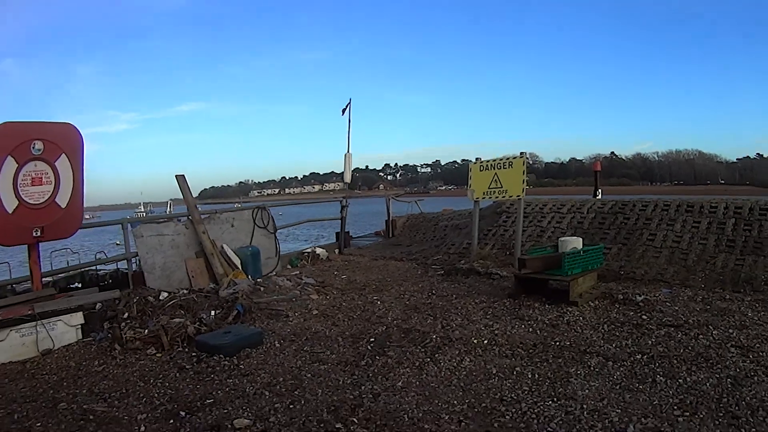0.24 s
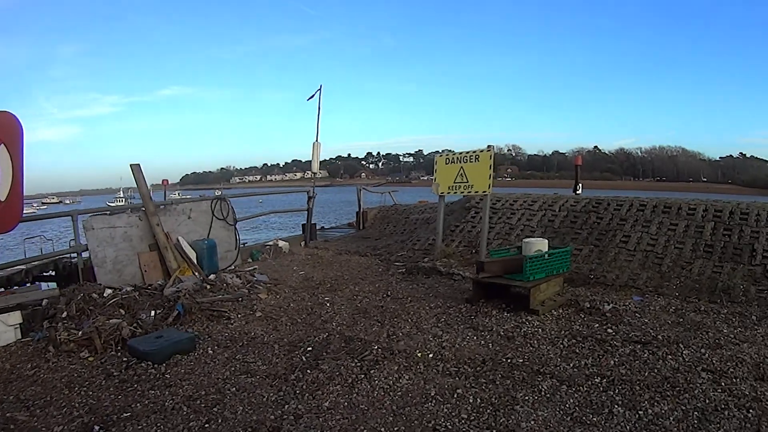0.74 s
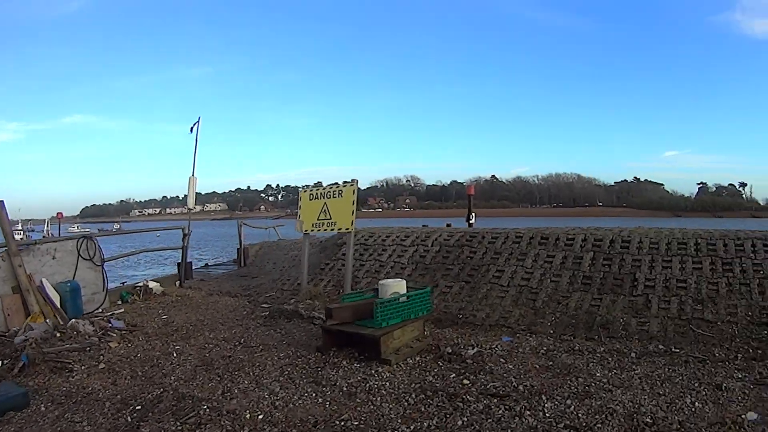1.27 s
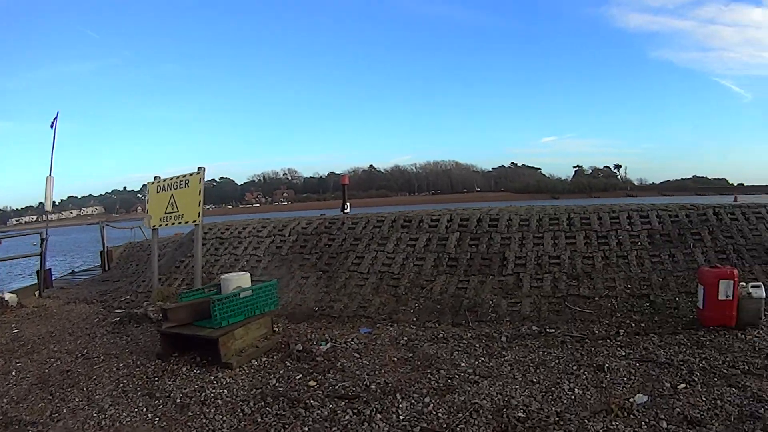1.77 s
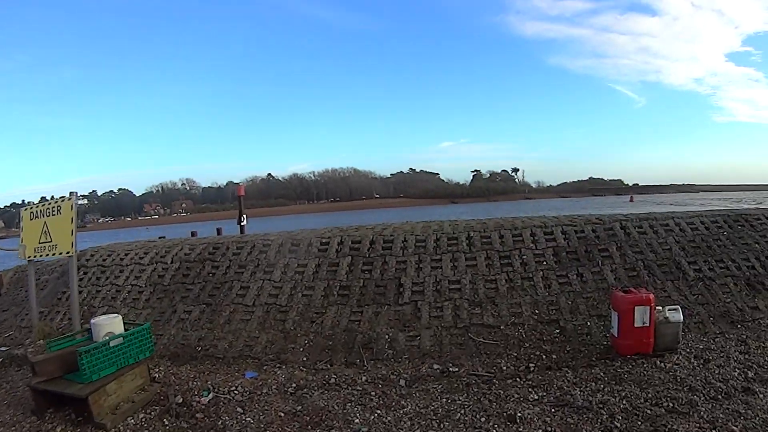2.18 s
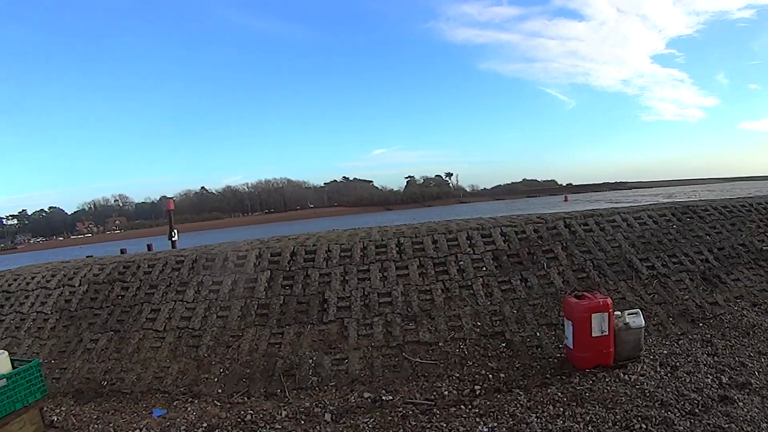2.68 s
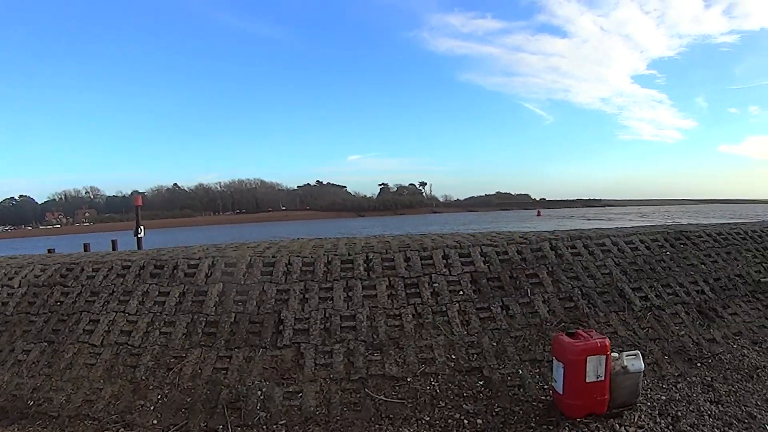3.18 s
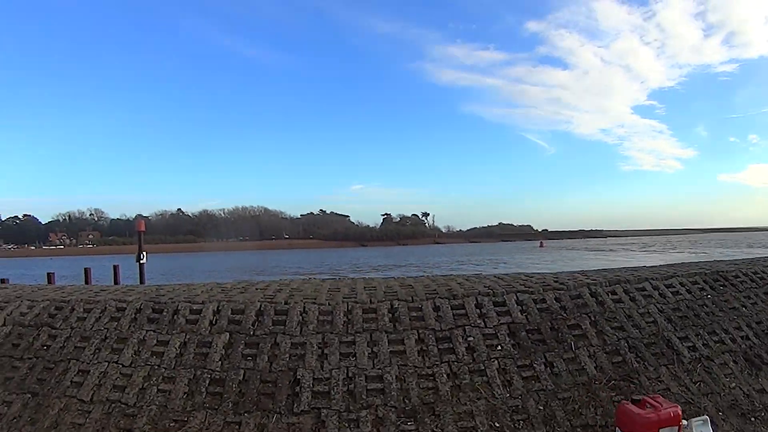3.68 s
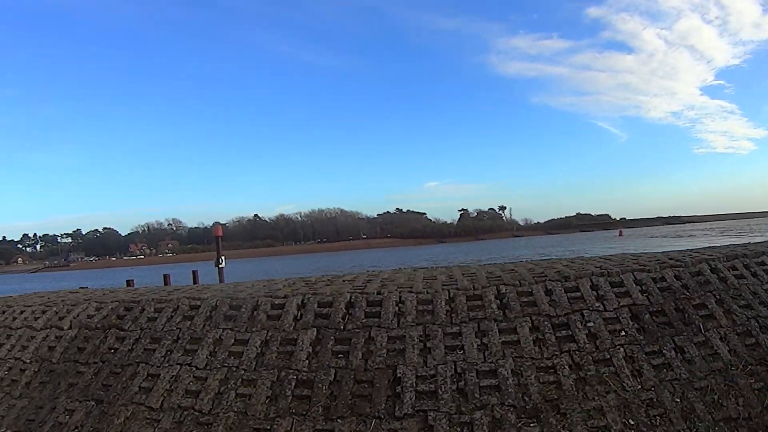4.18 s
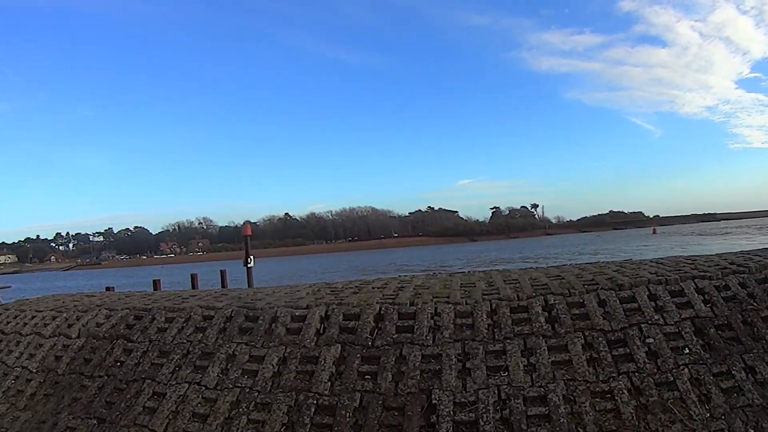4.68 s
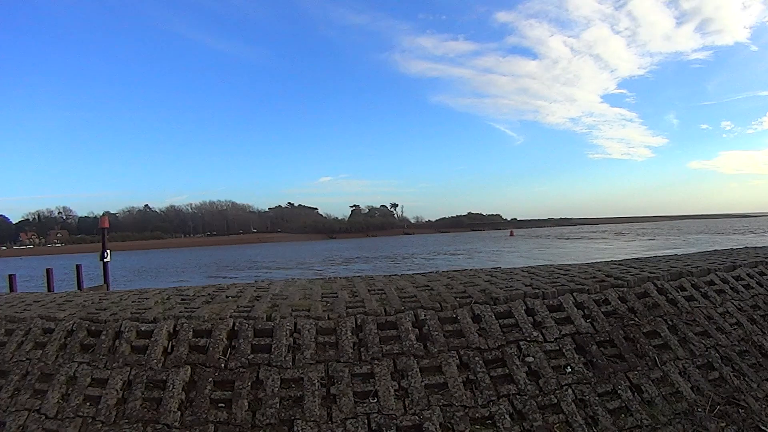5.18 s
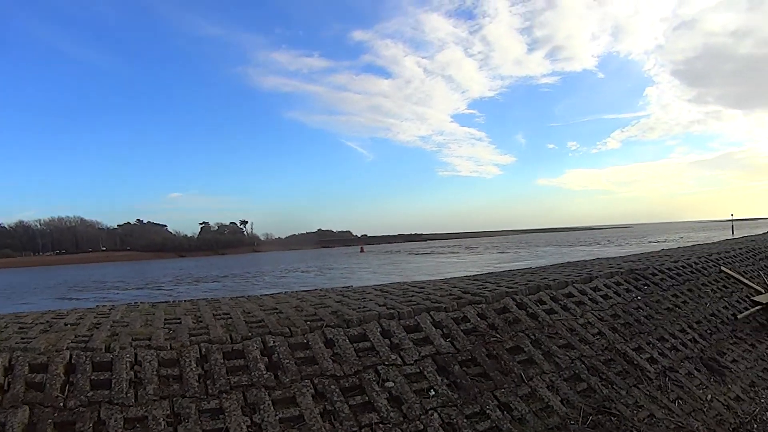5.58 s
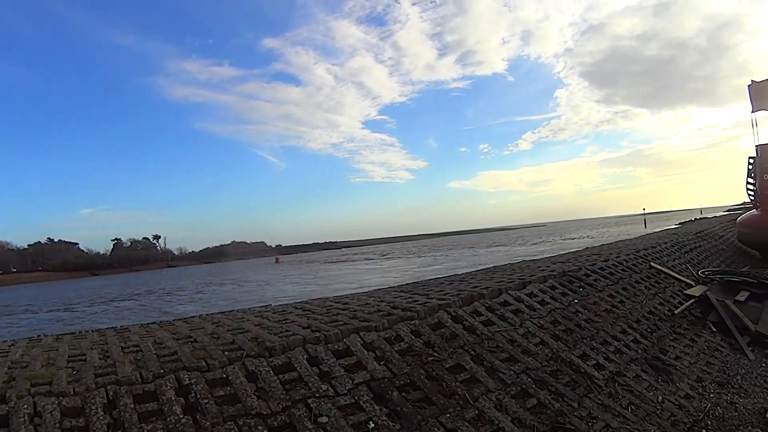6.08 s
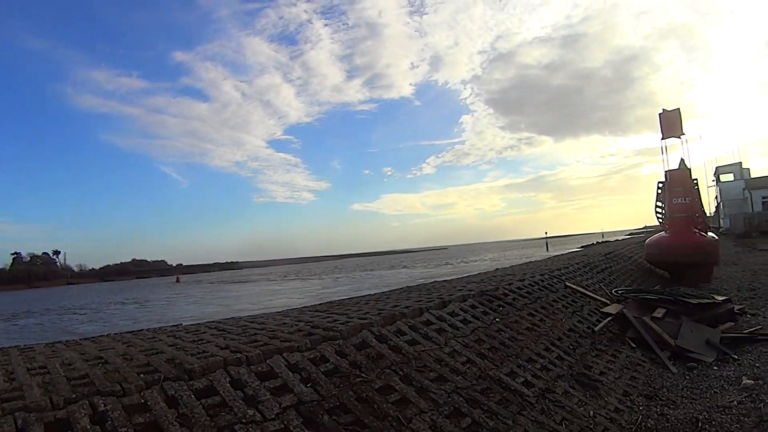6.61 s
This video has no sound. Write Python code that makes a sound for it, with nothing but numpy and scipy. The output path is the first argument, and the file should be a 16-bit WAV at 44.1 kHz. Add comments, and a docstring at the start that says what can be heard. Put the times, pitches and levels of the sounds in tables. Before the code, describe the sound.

Footsteps crunch at a walking pace on a pebble beach, single stones clacking underfoot. They sound hollow, heard from a small camera carried inside a closed plastic case. After a heavier, scuffing step comes a sharp knock on the case, then fingers start rubbing it. Loud knocks and rubs crowd together in the second half and ease off for one last step. A faint hush of wind and water lies underneath.

```python
"""Footsteps on a shingle beach, heard from a small camera carried in a closed plastic case.
From the start, each step crunches and clacks pebbles through the hollow ring of the case, over a faint
hush of wind and water, and the fittings tick now and then. Near 2 s a heavier step lands with a dull
scuff. A knock on the case follows, and fingers begin rubbing it around 2.5 s.
From 3.5 to 6 s the rubs and knocks crowd in, then ease off for one last step."""
import sys
import numpy as np
from scipy import signal
from scipy.fft import rfft, irfft, next_fast_len
from scipy.io import wavfile

SR = 44100
rng = np.random.default_rng(int(sys.argv[2]) if len(sys.argv) > 2 else 0)


def generate_wav(sig):
    """Save sig (samples, or channels by samples) to the path in sys.argv[1] as 16-bit PCM at SR."""
    pcm = np.round(np.clip(np.atleast_2d(sig).T, -1, 1) * 32767).astype(np.int16)
    wavfile.write(sys.argv[1], SR, pcm)


N = 302085
TIME = np.arange(N) / SR
OPPOSED = np.array([[1], [-1]])  # left and right in opposite polarity

# first the dull scuff of a heavy step, then fingers sliding on the case:
# start_s, swell_s, hold_s, level_db, rasp_db, treble_db, push_db
SCUFFS = [(1.723, 0.016, 0.019, -45.5, 2.5, 1.5, -33), (2.54, 0.013, 0.12, -52.5, 3, 3, -19),
          (3.43, 0.009, 0.1, -57, 12.5, 10, -7.5), (3.532, .003, 0.059, -41, 3, -2, -23),
          (3.847, 0.072, 0.0068, -41, -1.5, -1.5, -18), (4.037, 0.099, 0.039, -47, 7, 2.5, -25),
          (4.233, 0.0025, 0.047, -46.5, 1.5, -1.5, -11), (4.313, 0.074, 0.13, -42.5, 1, -1.5, -29),
          (4.911, 0.042, 0.048, -36, 4.5, 2.5, -18), (5.085, 0.056, 0.031, -47.5, 3.5, 0, -33),
          (5.237, 0.069, 0.033, -44.5, 5, 1, -17), (5.347, 0.038, 0.053, -45.5, 10, 12, -11),
          (5.57, 0.0018, 0.056, -39, 6, -3.5, -21), (5.651, 0.11, 0.0081, -42, 3, -0.5, -26),
          (5.816, 0.032, 0.15, -50, 1, 0.5, -8), (6.556, 0.012, 0.055, -54, 5, -2, -17),
          (6.692, 0.029, 0.017, -54.5, 4, -0.5, -20)]
# ring of the case when touched: pitch_hz, width_hz, level_db
CASE_MODES = [(120, 94, -7), (215, 360, -9.5), (321.6, 25.4, 2.5), (427, 54, -1), (713, 133, -0.5),
              (941, 23, -10), (1078, 22, -2), (1264, 620, -7.5), (1530, 203, 7.5), (1790, 610, -15.5),
              (2180, 110, -36), (2800, 20, -18), (2977, 127, -4), (4470, 770, -11), (5450, 800, -5.5),
              (7340, 820, -4), (8950, 940, -10)]


def footsteps(press, grind, crunch_db=-2, grit_db=-1, thud_db=-21, lurch_db=4.0, stone_width_hz=550):
    """The sole shoves pebbles along in small lurches, grit hisses, and the bed thuds under full weight."""
    # ring of the many small stones: pitch_hz, level_db
    stone_modes = [(1400, 5.5), (1560, 6), (1720, -3.5), (1950, 5)]
    # hiss of fine grit: frequency_hz, level_db
    grit_eq = [(1000, -24), (2800, 5), (3700, -5.5), (4600, 2), (5000, -1.5), (5500, 4), (6400, -14),
               (7700, -5), (8800, -4.5), (11000, -10)]
    # dull thud of the shingle bed: frequency_hz, level_db
    bed_eq = [(150, -12.5), (450, -5.5), (1100, 6), (2500, -15), (6000, -39)]
    lurch = undb(lurch_db * np.minimum(wander(480), 1))
    stones = np.zeros((2, N))  # mid and side
    for path in stones:
        for hz, db in stone_modes:
            path += ring(grains(rate_hz=200, spread_db=3.5, cap_db=9), [(hz, stone_width_hz, db)])
    crunch = through_case(*(press * lurch * stones)) / np.std(through_case(*stones))
    specks = (grains(rate_hz=3000, spread_db=12.5, cap_db=16) for _ in range(3))
    shared, left, right = (unit(colour(hits, grit_eq)) for hits in specks)
    grit = unit(0.7 * shared + np.array([left, right])) * grind
    thud = noise(bed_eq) * press ** 2 / press.max()
    return undb(crunch_db) * crunch + undb(grit_db) * grit + undb(thud_db) * thud


def tread(heel_s=0.06, roll_db=-8, lift_s=0.04, trickle_db=-64.5, trickle_grit_db=-1.5):
    """Envelopes of crunch and grit: each foot loads, the heel sinks in, the sole rolls and lifts."""
    # footfalls: full_weight_s, level_db, relative_grit_db, load_s, roll_s
    footfalls = [(0.17, -39, -10.5, .028, .21), (0.942, -39, -19, .055, .1), (1.40, -50.5, -12, .07, .24),
                 (1.575, -49, -10, .012, .06), (1.766, -38.5, -13.5, .035, .12),
                 (2.11, -46, -8.5, 0.072, .23), (2.57, -43.5, -17, .025, .09),
                 (3.385, -38.5, -19, .055, .06), (4.14, -46.5, -9.5, .04, 0.25),
                 (4.788, -41.5, -9.5, 0.066, .36), (5.81, -41, -25, .08, .08),
                 (6.385, -45, -6.5, .05, 0.13)]
    # stones keep settling between steps
    crunch_power, grit_power = undb(trickle_db) ** 2, undb(trickle_db + trickle_grit_db) ** 2
    for s, db, grit_db, load_s, roll_s in footfalls:
        before, after = np.maximum(s - TIME, 0), np.maximum(TIME - s, 0)
        heel = np.exp(-after / heel_s)
        roll = undb(roll_db) * np.exp(-np.maximum(after - roll_s, 0) / lift_s)
        weight = undb(db) * np.exp(-before / load_s) * np.maximum(heel, roll)
        crunch_power += weight ** 2
        grit_power += (weight * undb(grit_db)) ** 2
    return np.sqrt(crunch_power), np.sqrt(grit_power)


def pebbles(press, boost_db=3, chatter=0.089, chatter_s=0.0026, width_hz=850, size=2048):
    """A pebble strikes its neighbour at its own pitch and chatters for a few milliseconds."""
    # stand-out single clacks: start_s, level_db, pitch_hz
    clacks = [(0.1541, -28.5, 1740), (0.184, -29.5, 1540), (0.2543, -39, 1530), (0.39, -38.5, 1570),
              (0.408, -37, 1620), (0.723, -37, 1700), (0.928, -22.5, 1670), (0.99, -33.5, 1630),
              (1.414, -36.5, 1540), (1.496, -38, 1650), (1.6148, -33, 1780), (1.678, -33.5, 1770),
              (1.698, -33, 1600), (1.7394, -30, 1560), (1.769, -21.5, 1430), (1.9196, -36, 1600),
              (2.5661, -31.5, 1570), (2.769, -40.5, 1550), (2.958, -36.5, 1790), (3.024, -30, 1730),
              (3.1084, -32.5, 1840), (3.207, -32.5, 1910), (3.3707, -32, 1600), (3.392, -42, 1550),
              (3.564, -29, 1580), (4.2754, -35.5, 1580), (4.5983, -41.5, 1530), (4.8181, -32, 1550),
              (4.8456, -33, 1540), (4.8972, -26.5, 1750), (5.706, -34, 1540), (5.732, -33, 1550),
              (5.9215, -28, 1600), (6.0145, -37, 1450), (6.268, -36.5, 1597), (6.3376, -26.5, 1500),
              (6.5714, -39, 1680)]
    stone_eq = [(150, -12), (500, 2), (2800, 4), (5000, 6.0)]
    out = np.zeros((2, N))
    for s, db, hz in clacks + loose_pebbles(press):
        forces = chatter * burst(chatter_s, (2, size))
        forces[0, 0] += 1  # the strike itself, in the mid only
        mid, side = (colour(ring(force, [(hz, width_hz, 0)]), stone_eq) for force in forces)
        add(out, s, at_peak(through_case(mid, side), db + boost_db))
    return out


def loose_pebbles(press, count=44, level_db=-34, spread_db=1, follow=0.38, pitch_hz=1590, spread_hz=47):
    """Lesser pebbles slip at random, more often and harder under load: start_s, level_db, pitch_hz."""
    scatter = rng.standard_normal((count, 2))
    slipped = np.cumsum(press)
    onsets = np.searchsorted(slipped, slipped[-1] * (np.arange(count) + rng.random(count)) / count)
    load_db = 20 * np.log10(press[onsets] / press.max())
    db = level_db + follow * load_db + spread_db * scatter[:, 0]
    return list(zip(TIME[onsets], db, pitch_hz + spread_hz * scatter[:, 1]))


def through_case(mid, side, left_db=-1.75):
    """Outside sound rings the air in the case; the left microphone hears it a touch later and weaker."""
    # hollow tone common to both microphones: frequency_hz, level_db
    mid_eq = [(100, -11), (450, -11), (750, -17), (950, -14.5), (1250, -10.5), (1430, -8), (1570, 4.5),
              (1720, -3), (1950, -7.5), (2350, -18.5), (2850, -12.5), (3400, -35), (5400, -19.5),
              (11000, -24)]
    # tone opposed between them: frequency_hz, level_db
    side_eq = [(100, -34), (450, -9), (900, -39.5), (1300, -17), (1570, -28.5), (2300, -28), (3000, -7),
               (3700, -14.5), (5400, -50), (11000, -44)]
    mid, side = colour(mid, mid_eq), colour(side, side_eq)
    late_mid = np.append(0, mid[:-1])
    return np.array([undb(left_db) * (late_mid + side), mid - side])


def knocks(rattle_s=0.0039, buzz_db=-23, buzz_s=0.052, size=8192):
    """A blow on the case: soft contacts thump, hard ones crack, and the camera rattles inside."""
    # blows: start_s, peak_db, thump_db, boom_db, body_db, treble_db, rattle_db
    blows = [(2.401, -12, -9, -7.5, 6.5, -8, -13.5), (2.406, -47, -11, 1, 16, -4, -20),
             (3.5356, -6, 9, 8, 1, -16, -19.5), (3.585, -21, -10, 0, -1, -2.5, -21),
             (4.2385, -35.5, 26, 9, 11, -11, -1), (4.405, -10, 3, -3, 7, -8, -2.5),
             (5.3706, -5.5, 5.5, 4.5, 9.5, -3, -14.5), (5.4537, -13, 8, 16.5, 5, 4, -16),
             (5.4558, -9, 0.5, 12.5, 13, -14, -12), (5.724, -29.5, 27, 25, 5, -15, -13),
             (5.7677, -13, 18, 7, 17.5, -10.5, -9)]
    rattle_eq = [(200, -29), (1500, 7.5), (4000, 9.5)]  # small hard contacts carry mostly treble
    impulse = TIME[:size] == 0
    out = np.zeros((2, N))
    for s, db, thump_db, boom_db, body_db, treble_db, rattle_db in blows:
        rattle, buzz = (unit(burst(decay_s, size)) / np.sqrt(size) for decay_s in (rattle_s, buzz_s))
        force = impulse + undb(rattle_db) * colour(rattle, rattle_eq) + undb(buzz_db) * buzz
        # where the blow lands decides which of the low modes it wakes
        contact_eq = [(30, thump_db - 4.5), (140, thump_db), (330, boom_db),
                      (560, (boom_db + body_db) / 2 - 2.0), (740, body_db), (1000, body_db - 1.0),
                      (1250, 0.74), (1550, 0.55), (2200, 2.4), (3000, 0),
                      (3800, treble_db + 6.5), (5400, treble_db - 0.5), (11000, treble_db - 18.0)]
        knock = flex(ring(colour(force, contact_eq), CASE_MODES))
        add(out, s, at_peak(knock, db))
    return out


def scuffs(trim_db=-2, body_db=-0.5, far_wall_db=-7, jerk_db=2.0):
    """Stick and slip in dense little jerks: one heavy step's dull scuff, then skin on the plastic."""
    # tone of the friction: frequency_hz, level_db
    slip_eq = [(60, -12), (300, -2), (750, 7), (1570, 2.5), (2500, 2), (4000, 3), (7000, -5), (11000, -8.5)]
    grip = undb(jerk_db * wander(1100))  # catches and lets go every few milliseconds
    slips = [grip * colour(grains(rate_hz=4500, spread_db=4.5, cap_db=3.5), slip_eq) for _ in range(2)]
    force = np.zeros((2, N))
    for s, swell_s, hold_s, db, rasp_db, treble_db, _ in SCUFFS:
        pressure = stroke(s, swell_s, hold_s) * undb(db + trim_db)
        touching = pressure > 0
        touch_eq = [(750, body_db), (1550, 0.0038), (2400, rasp_db), (3200, rasp_db), (6000, treble_db)]
        add(force, s, np.array([colour((slip * pressure)[touching], touch_eq) for slip in slips]))
    near_wall = flex(ring(force[0], CASE_MODES))
    # drag on the far wall pushes the microphones in opposite ways
    drag = colour(force[1], [(100, -4), (400, -4), (1600, -16.5), (3000, -2)])
    far_wall = ring(drag, CASE_MODES) * OPPOSED
    return (near_wall + undb(far_wall_db) * far_wall) / np.std(ring(slips[0], CASE_MODES))


def stroke(start_s, swell_s, hold_s, release_s=0.058, grab_db=5.5, grab_s=0.0099):
    """Pressure of one scuff: swell, hold, release. A fast landing starts harder, then eases."""
    grab = undb(grab_db * np.exp(-swell_s / grab_s))
    return np.interp(TIME, start_s + np.cumsum([0, swell_s, hold_s, release_s]), [0, grab, 1, 0])


def ticks(boost_db=4, scrape_s=0.0026, width_hz=300, size=2048):
    """Small hard fittings on the case shift with a short, bright scrape."""
    # thin ticks: start_s, level_db, pitch_hz
    shifts = [(0.388, -45, 6350), (1.073, -47.5, 7550), (1.254, -46, 5660), (1.4317, -43, 5430),
              (2.554, -41.5, 5450), (2.7207, -38.5, 6060), (4.304, -38.5, 4730), (4.7311, -37, 9200),
              (4.8865, -40, 5270), (5.396, -30, 7800), (5.4546, -25, 5800), (6.6497, -47.5, 7700)]
    # ring that the fittings share: pitch_hz, width_hz, level_db
    fitting_modes = [(5630, 120, 1.5), (7820, 330, -6.5), (9220, 650, -3.5)]
    out = np.zeros((2, N))
    for s, db, hz in shifts:
        tick = flex(ring(burst(scrape_s, size), [(hz, width_hz, 0), *fitting_modes]))
        add(out, s, at_peak(tick, db + boost_db))
    return out


def flex(x, travel_s=0.001167):
    """Bending waves cross the case to the two microphones, treble first (travel_s at 1 kHz)."""
    # the flexing case moves the microphones out of step: frequency_hz, left_lead_rad, left_over_right_db
    stereo_skew = [(60, -0.62, -4), (174, 0.061, 1.5), (325, -1.85, 0.5), (480, -1.36, -1.5),
                   (740, -1.28, -10), (1300, -1.65, 3.5), (1600, -0.4, -4.5), (2240, -1.16, 6),
                   (2500, 0.95, -1.5), (4340, 1.75, -2), (5800, -0.72, -1.5), (11300, -1.47, 2)]
    hz, lead, left_db = np.transpose(stereo_skew)
    size = next_fast_len(len(x) + 2048)
    grid = np.fft.rfftfreq(size, 1 / SR)
    bending = np.exp(-4j * np.pi * travel_s * np.sqrt(1000 * grid))
    half_skew = np.exp(.5j * np.interp(grid, hz, lead)) * undb(np.interp(grid, hz, left_db) / 2)
    return irfft(rfft(x, size) * bending * np.array([half_skew, 1 / half_skew]), size)[:, :len(x)]


def background(mid_db=-58.5, side_db=-57.5, waver_db=1, rumble_db=1, buffet_db=3.0):
    """A slowly wavering hush, and a rumble from carrying the camera that swells with the scuffs."""
    # wind, water and microphone hiss, centre: frequency_hz, level_db
    hush_mid_eq = [(100, 9), (450, 7), (1000, 5), (1300, 6), (1580, 13.5), (1900, 7.5), (2400, 2.5),
                   (4000, -0.5), (6300, -0.5), (6750, 3.5), (7200, -1), (11000, -4.5)]
    # the stereo width of that hush: frequency_hz, level_db
    hush_side_eq = [(60, 3.5), (250, 13), (520, 15.5), (900, 15.5), (1600, 13.5), (2300, 10), (3000, 9.5),
                    (4200, 4), (7000, 1.5), (11000, -8)]
    # handling rumble: frequency_hz, level_db
    rumble_eq = [(12, -25), (28, -0.5), (70, -4.5), (150, -11.5), (300, -18), (700, -42), (2000, -66)]
    # rise and fall of the rumble during the walk: time_s, level_db
    carry_levels = [(0, -68.5), (1.1, -65), (2.7, -63.5), (3.2, -68.5), (4.3, -68.5), (4.7, -63.5),
                    (5.9, -66), (6.85, -73.5)]
    mid, side, rumble = noise(hush_mid_eq), noise(hush_side_eq), noise(rumble_eq)
    hush = undb(mid_db) * mid + undb(side_db + waver_db * wander(30)) * side * OPPOSED
    carry = undb(np.interp(TIME, *np.transpose(carry_levels)))
    push = sum(stroke(s, swell_s, hold_s) * undb(db + push_db)
               for s, swell_s, hold_s, db, _, _, push_db in SCUFFS)
    return hush + rumble * np.hypot(carry, push) * undb(rumble_db + buffet_db * wander(110))


def grains(rate_hz, spread_db, cap_db):
    """Random tiny impacts, many weak and a few strong; rms 1."""
    strength = undb(np.minimum(spread_db * rng.exponential(size=N), cap_db))
    hits = rng.random(N) < rate_hz / SR
    return unit(hits * strength * rng.choice([-1, 1], N))


def burst(decay_s, shape):
    """White noise that dies away."""
    white = rng.standard_normal(shape)
    return white * np.exp(-TIME[:white.shape[-1]] / decay_s)


def noise(eq):
    """Steady coloured noise; rms 1."""
    return unit(colour(rng.standard_normal(N), eq))


def wander(points):
    """A random drift through points spread evenly over the scene."""
    return np.interp(TIME, np.linspace(0, TIME[-1], points), rng.standard_normal(points))


def ring(x, modes, size=6000):
    """Drive damped modes given as pitch_hz, width_hz, level_db."""
    t = TIME[:size]
    response = sum(undb(db) * width * np.exp(-np.pi * width * t) * np.cos(2 * np.pi * hz * t)
                   for hz, width, db in modes)
    response[0] /= 2
    return signal.fftconvolve(x, response / SR)[:len(x)]


def colour(x, eq, size=4096):
    """Minimum-phase EQ through points of frequency_hz, level_db."""
    hz, db = np.transpose(eq)
    grid = np.maximum(np.fft.rfftfreq(size, 1 / SR), 1)
    gain = undb(np.interp(np.log(grid), np.log(hz), db))
    cepstrum = irfft(np.log(gain))
    # folding the cepstrum makes the filter causal
    cepstrum[1:size // 2] *= 2
    cepstrum[size // 2 + 1:] = 0
    return signal.fftconvolve(x, irfft(np.exp(rfft(cepstrum))))[:len(x)]


def undb(db):
    """Decibels to gain."""
    return 10 ** (np.asarray(db) / 20)


def unit(x):
    """Scale to rms 1."""
    return x / np.sqrt(np.mean(x ** 2))


def at_peak(x, db):
    """Scale to a peak level."""
    return x * undb(db) / np.abs(x).max()


def add(track, start_s, sound):
    """Mix a sound into a track."""
    part = track[..., int(start_s * SR):][..., :sound.shape[-1]]
    part += sound[..., :part.shape[-1]]


def scene():
    """Steps on the beach and the hand on the camera, over the hush."""
    press, grind = tread()
    return footsteps(press, grind) + pebbles(press) + scuffs() + knocks() + ticks() + background()


def record(dry):
    """The camera cuts the top end steeply."""
    cutoff_hz = 11120
    return signal.sosfilt(signal.ellip(10, .2, 70, cutoff_hz, fs=SR, output="sos"), dry)


dry = scene()
out = record(dry)
generate_wav(out)
```